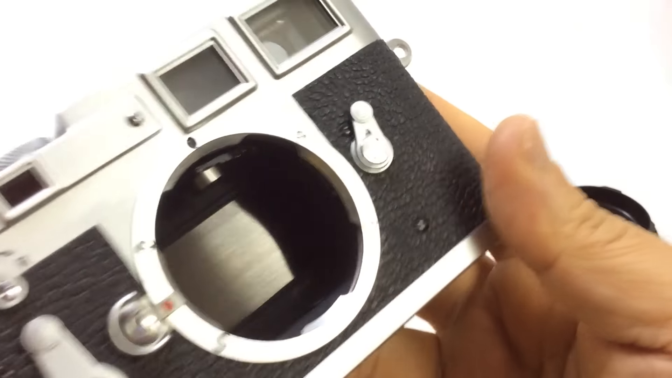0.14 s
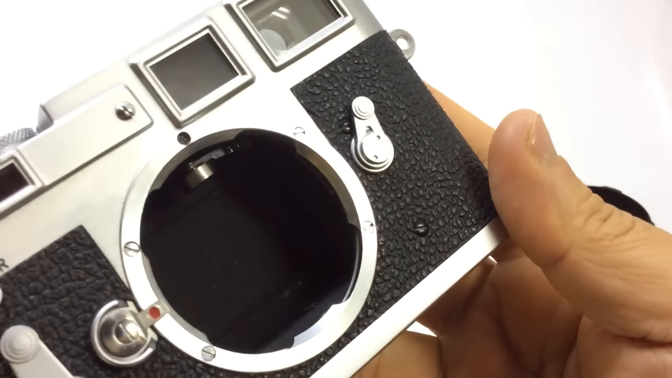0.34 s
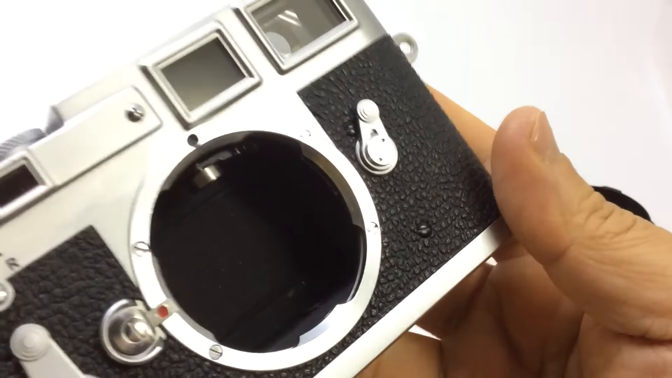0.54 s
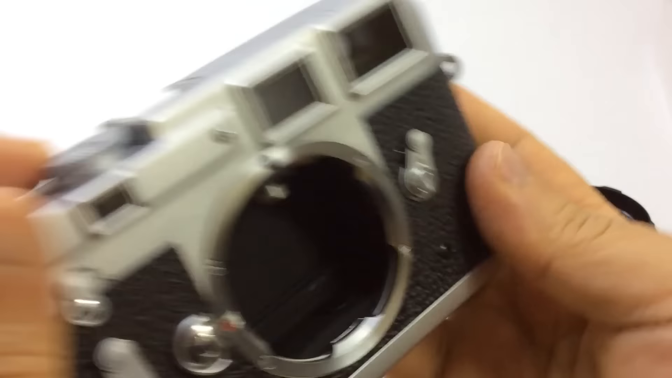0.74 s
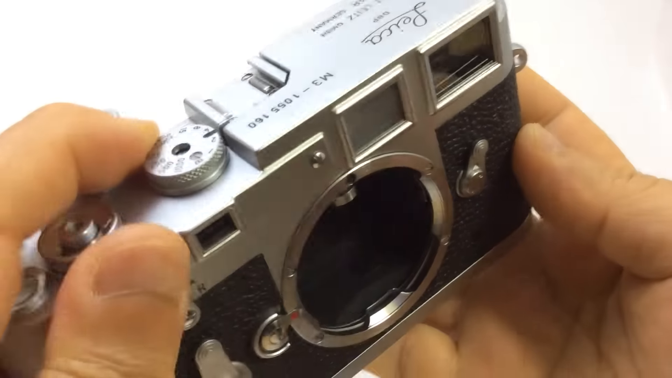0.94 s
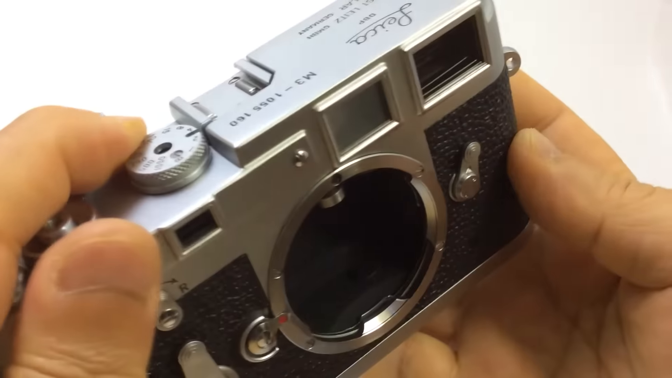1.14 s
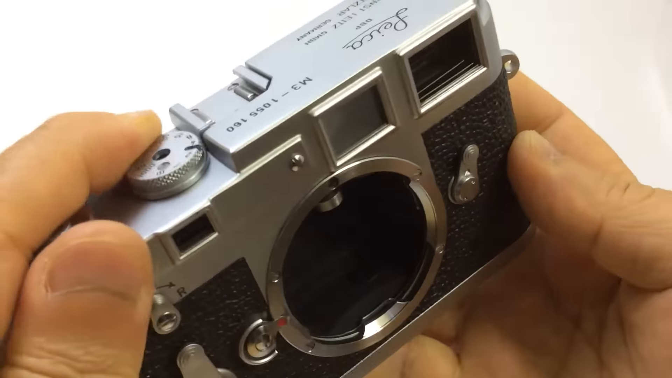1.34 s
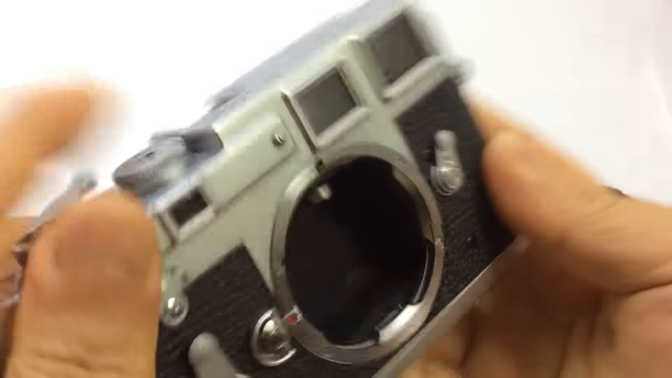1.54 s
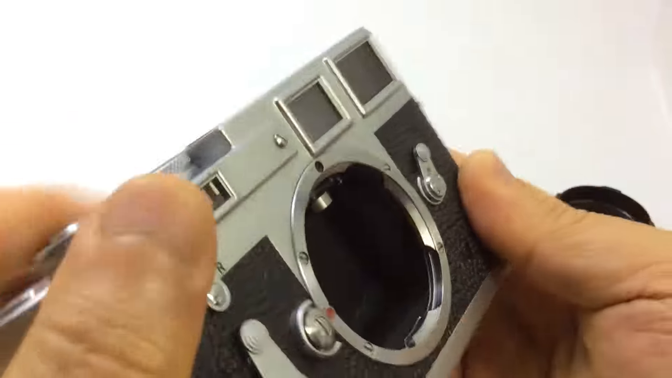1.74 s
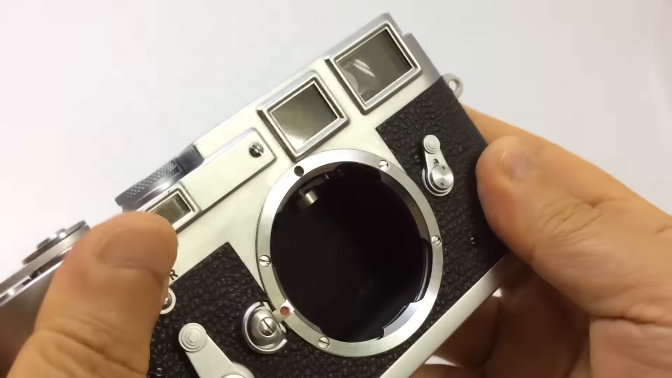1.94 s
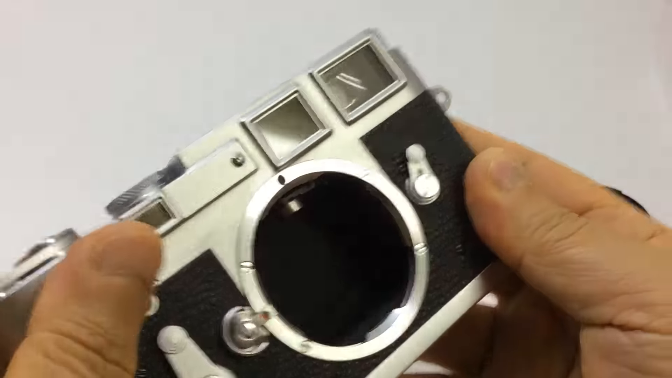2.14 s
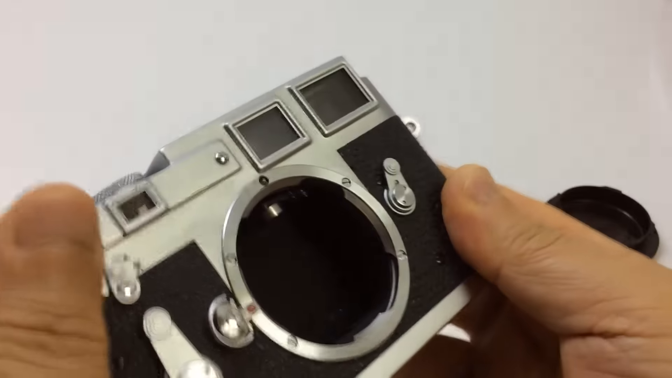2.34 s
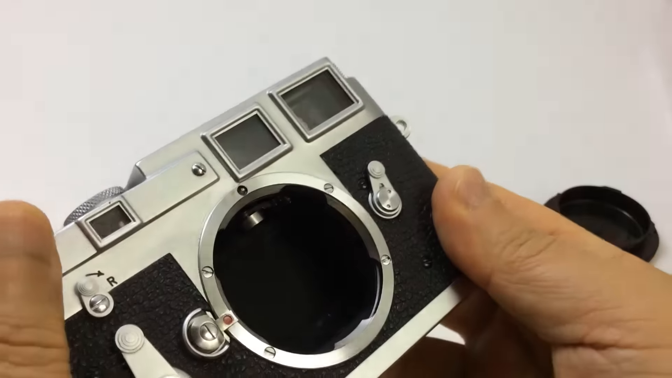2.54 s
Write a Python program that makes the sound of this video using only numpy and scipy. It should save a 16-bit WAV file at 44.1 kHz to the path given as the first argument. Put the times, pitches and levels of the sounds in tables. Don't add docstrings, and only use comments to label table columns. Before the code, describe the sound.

Mechanical camera shutter fires sharply, whirrs down, then dial clicks and a crunchy film lever wind follow

```python
import sys
import numpy as np
from scipy import signal
from scipy.fft import rfft, irfft
from scipy.io import wavfile

SR = 44100
rng = np.random.default_rng(int(sys.argv[2]) if len(sys.argv) > 2 else 0)


def put_to_file(sound):
    columns = np.atleast_2d(sound).T
    safe = np.clip(columns, -1, 1)
    whole_steps = np.round(safe * 32767)
    wavfile.write(sys.argv[1], SR, whole_steps.astype(np.int16))


def convert_level_to_amplitude(level_db):
    exponent = np.asarray(level_db, float) / 20
    return 10 ** exponent


N = 116865

# (frequency [Hz], density [dB per Hz])
WIND_COLOUR = [(180, -45), (300, -27.5), (900, -8.5), (1930, 0.5), (3600, -1), (5800, -4), (9550, 2.5),
               (14200, -13.5), (16000, -21.5)]
# (frequency [Hz], density [dB per Hz])
LEVER_COLOUR = [(180, -69), (300, -40.5), (1750, -15), (2570, 1), (3240, -10.5), (3700, 1.5), (5250, -15.5),
                (9240, -17.5), (16000, -31.5)]
# (frequency [Hz], level [dB], t60 [s])
LEVER_MODES = [(1461, -6, 0.028), (2146, -21, 0.076), (2890, -14, 0.035), (3660, -7, 0.026),
               (3670, 2.5, 0.023), (3830, -6, 0.017), (9060, -6, 0.011)]


def curve(rows, column=1):
    return np.interp(np.arange(N) / SR, np.array(rows)[:, 0], np.array(rows)[:, column])


def rms_one(x):
    return x / np.sqrt(np.mean(x ** 2) + 1e-20)


def cut(x, hz, kind, order=2):
    return signal.sosfilt(signal.butter(order, hz, kind, fs=SR, output="sos"), x)


def noise_band(low_hz, high_hz):
    return rms_one(cut(rng.standard_normal(N), [low_hz, high_hz], "band"))


def drift(rate_hz):
    r = np.exp(-2 * np.pi * rate_hz / SR)
    return rms_one(signal.lfilter([1], [1, -2 * r, r * r], rng.standard_normal(N + SR))[SR:])


def colour(x, points):
    hz = np.maximum(np.fft.rfftfreq(2048, 1 / SR), 20)
    p = np.array(points)
    db = np.maximum(np.interp(np.log(hz), np.log(p[:, 0]), p[:, 1]), -70)
    cepstrum = irfft(np.log(10) / 20 * db)
    cepstrum[1:1024] *= 2
    cepstrum[1025:] = 0
    taps = irfft(np.exp(rfft(cepstrum)))
    return signal.fftconvolve(x, taps / np.linalg.norm(taps))[:len(x)]


def rings(x, modes):
    out = 0
    for hz, db, t60_s in modes:
        r = convert_level_to_amplitude(-60 / (np.clip(t60_s, .005, 150 / hz) * SR))
        w = 2 * np.pi * hz / SR
        out = out + convert_level_to_amplitude(db) * signal.lfilter([0, np.sin(w)], [1, -2 * r * np.cos(w), r * r], x + 1e-18)
    return out


def grit(per_s):
    spread_db = 2.5
    size = convert_level_to_amplitude(spread_db * np.minimum(rng.exponential(1, N), 3)) * rng.choice([-1, 1], N)
    return rms_one(size * (rng.random(N) < per_s / SR))


def tilt(low, mid, high):
    low_hz, high_hz = 3100, 5960
    middle = cut(mid, [low_hz, high_hz], "band")
    return cut(low, low_hz, "low") - middle + cut(high, high_hz, "high")


def blows(rows, points, modes, ring_db):
    rise_s, crack_db, strike_db = .0005, -12.5, 7
    force, contacts = np.zeros((3, N)), grit(26000)
    for s, db, low_db, high_db, t60_s in rows:
        i = int(s * SR)
        t = np.arange(min(N - i, SR // 4)) / SR
        decay = convert_level_to_amplitude(-60 * t / max(t60_s, .003))
        burst = decay * (1 - np.exp(-t / rise_s)) * contacts[i:i + len(t)]
        burst[int(rise_s * SR)] = convert_level_to_amplitude(strike_db)
        band_gain = convert_level_to_amplitude(np.array([[low_db], [0], [high_db]]))
        force[:, i:i + len(t)] += convert_level_to_amplitude(db + crack_db) * burst * band_gain
    hit = tilt(*force)
    return colour(hit, points) + convert_level_to_amplitude(ring_db - 27.5) * rings(hit, modes)


def shutter():
    # (time [s], peak [dB], lows [dB], highs [dB], rattle t60 [s])
    slams = [
        (.0915, -35, 11, -2, 0.04),
        (.2154, -21.5, -14.5, 3.5, .018),
        (.2257, -31, -1.5, 5.5, 0.017),
        (.2377, -16.5, -2.5, 6, 0.012),
        (.2392, 0, -5.5, 0, 0.018),
        (.2413, -3, 6, -2, 0.018),
        (.2433, -12, 7, -3.5, 0.028),
        (.2461, -14, 1, 0.5, 0.01),
    ]
    # (frequency [Hz], density [dB per Hz])
    body = [(180, -52), (400, -20), (1150, -19), (1900, -7), (4200, -20.5), (6300, -12.5), (10900, -1),
            (14700, -31), (16000, -40.5)]
    # (frequency [Hz], level [dB], t60 [s])
    modes = [(1900, -13.5, .03), (3150, -10.5, 0.016), (5610, -8.5, 0.033), (6220, 1, .02),
             (7830, -2.5, .02), (9180, -8, .016), (11100, -3, .014), (14110, -5, 0.011)]
    return blows(slams, body, modes, ring_db=-1.0)


def escapement(times_s, db, t60_s, ring_db, body_db):
    # (frequency [Hz], density [dB per Hz])
    body = [(710, -41), (1200, -17), (2040, -7.5), (2590, -4), (3600, 0), (4600, -7), (10500, -4),
            (15200, -16), (16000, -44)]
    # (frequency [Hz], level [dB], t60 [s])
    modes = [(2637, -6, 0.036), (2540, -12, 0.017), (3287, -15.5, .035), (3600, -10.5, 0.028),
             (5010, -13.5, 0.022), (5750, -9, .015), (6637, -14.5, 0.026), (8270, -8, 0.015),
             (9216, -14, .016), (10550, -7, 0.0055)]
    clicks = np.zeros(N)
    clicks[(times_s * SR).astype(int)] = convert_level_to_amplitude(db + 1.1 * rng.standard_normal(len(times_s)))
    hit = signal.lfilter([1], [1, -convert_level_to_amplitude(-60 / (t60_s * SR))], clicks) * grit(14000)
    return convert_level_to_amplitude(body_db) * colour(hit, body) + convert_level_to_amplitude(ring_db) * rings(hit, modes)


def whirr():
    # (time [s], level [dB])
    load = [(0, -48.5), (.05, -52), (.2, -49.5), (.236, -47.5)]
    beats_per_s = 200
    times_s = np.arange(.002, load[-1][0], 1 / beats_per_s)
    db = np.interp(times_s, *np.transpose(load))
    return escapement(times_s, db, t60_s=0.025, ring_db=-17.5, body_db=-0.5)


def buzz():
    # (time [s], beats done)
    progress = [(.2513, 0), (.4793, 20), (.7073, 40), (.8001, 48), (.9214, 58)]
    # (time [s], level [dB])
    levels = [(.25, -58), (.45, -59.5), (.7, -60), (.92, -62.5)]
    weak_db, jitter_s = -2.2, 0.00068
    beat = np.arange(59)
    done_s, done = np.transpose(progress)
    times_s = np.interp(beat, done, done_s) + jitter_s * rng.standard_normal(len(beat))
    db = np.interp(times_s, *np.transpose(levels)) + weak_db * (beat % 2)
    return escapement(times_s, db, t60_s=.05, ring_db=-21, body_db=-1)


def dial():
    # (time [s], peak [dB], lows [dB], highs [dB], rattle t60 [s])
    detents = [
        (.957, -62, 18, -4, 0.044),
        (1.314, -55, 8, 8, 0.027),
        (1.3875, -41.5, 4.5, 9, 0.033),
        (1.598, -53, 6, 3, 0.022),
        (1.630, -68.5, 11.5, 3.5, 0.045),
        (1.7455, -49.5, 11, 14.5, 0.027),
    ]
    return blows(detents, LEVER_COLOUR, LEVER_MODES, ring_db=-23)


def winding():
    # (time [s], peak [dB], lows [dB], highs [dB], rattle t60 [s])
    catches = [(1.7985, -39, 6.5, -2, 0.03), (1.8195, -45, -2, -3, .02), (1.8238, -27, -4.5, -19, .02),
               (1.8322, -23.5, -22, -11.5, 0.044), (1.848, -17, -6, -5, 0.039),
               (1.8684, -34, -10, -2, 0.015), (1.8725, -31, 7, -1.5, 0.056), (1.8938, -35, 9, -4, 0.029),
               (1.906, -39, 4, -2, 0.022), (1.917, -36, 8, -6, 0.027), (1.928, -36, -7, -6, 0.026),
               (1.9395, -58, 28, 32, 0.021), (1.944, -21.5, -1, 10, 0.029), (1.962, -32, 2, -2, 0.024),
               (1.974, -36, -8, 5, 0.017), (2.001, -42, -3, -5, .025), (2.017, -37, 6, -5, 0.023),
               (2.043, -43, 1, -7, 0.036), (2.0613, -38, 9, -3, 0.04), (2.0779, -43, 10, 15, 0.02),
               (2.0845, -20, -4, -1, 0.021), (2.0898, -10.5, -5, -1, 0.03), (2.1066, -10, 2.5, 5.5, 0.03),
               (2.1103, -11, -1, -3.5, 0.019), (2.1295, -28.5, -4, 15, 0.0067), (2.144, -34, -6, 6, 0.025)]
    # (frequency [Hz], level [dB], t60 [s])
    modes = [(1043, 1.5, 0.026), (2180, -35, 0.016), (3110, -14, .03), (3486, -4.5, 0.016), (3810, 3, .014),
             (8050, 3, .02), (9650, 0.5, .02)]
    return blows(catches, WIND_COLOUR, modes, ring_db=-7)


def lever_return():
    # (time [s], peak [dB], lows [dB], highs [dB])
    ratchet = [(2.2555, -44, 4, 11), (2.265, -47, 2.5, 21), (2.2761, -46, -1, 12), (2.2897, -44, 2, 20),
               (2.298, -39.5, 5, 11), (2.3106, -60, 5, 13), (2.323, -47.5, 7, 20.5), (2.3344, -53, 15, 22),
               (2.3471, -54, 13, 21)]
    # (time [s], peak [dB], lows [dB], highs [dB], rattle t60 [s])
    stop = [
        (2.3576, -44, 14, -2, 0.019),
        (2.3595, -44, 3, 21, 0.076),
        (2.366, -13, 2.5, 7, 0.014),
        (2.3707, -28.5, 0, 17, 0.019),
        (2.3855, -46, -10, 11, 0.019),
    ]
    tick_t60_s = 0.022
    ticks = [tick + (tick_t60_s,) for tick in ratchet]
    return blows(ticks + stop, LEVER_COLOUR, LEVER_MODES, ring_db=1.5)


def rubs():
    # (start [s], length [s], level [dB], highs [dB])
    slides = [
        (0, 0.078, -52, 3),
        (0.21, 0.054, -47, -1),
        (0.943, 0.14, -71.5, -22.5),
        (1.312, 0.065, -67, -6.5),
        (1.603, 0.15, -72.5, -4.5),
        (1.73, 0.02, -69.5, -9),
        (1.802, 0.043, -73, 3),
        (1.814, 0.24, -61, -7.5),
        (1.93, 0.29, -60.5, -7),
        (2.246, 0.31, -62.5, 0),
    ]
    edge_s = .006
    t, low, high = np.arange(N) / SR, 0, 0
    for s, length_s, db, high_db in slides:
        rise = np.clip((t - s) / edge_s + (s < .001), 0, 1)
        fall = np.clip((s + length_s - t) / (0.76 * length_s), 0, 1) ** 2
        shape = convert_level_to_amplitude(db) * rise * fall
        low = low + shape
        high = high + shape * convert_level_to_amplitude(high_db)
    grains = (grit(4200) + rng.standard_normal(N)) * convert_level_to_amplitude(1.17 * drift(70))
    grains = grains + convert_level_to_amplitude(-3.5) * grit(90)
    return colour(tilt(low * grains, low * grains, high * grains), WIND_COLOUR)


def struck_parts():
    # (time [s], frequency [Hz], peak [dB], t60 [s])
    parts = [(.0915, 1100, -46, 0.027), (.2385, 1644, -22.5, 0.041), (.2388, 426, -33, 0.03),
             (.2391, 248, -55, 0.06), (.2395, 3600, -16.5, 0.022), (.2398, 2690, -26, 0.023),
             (.243, 567, -35.5, 0.062), (.248, 1658, -50, 0.25), (.274, 3675, -38.5, .06),
             (1.8205, 690, -49.5, 0.084), (1.851, 705, -39, 0.046), (1.8672, 3600, -42, 0.044),
             (1.8722, 710, -48, .035), (1.8735, 1720, -52, 0.016), (1.8745, 3680, -44.5, .06),
             (1.9445, 8130, -37, 0.091), (2.0607, 1840, -39, 0.012), (2.085, 1700, -32.5, 0.033),
             (1.9, 1410, -50, 0.018), (2.1068, 1924, -29.5, 0.03), (2.1072, 704, -28.5, 0.053),
             (2.1076, 408, -39.5, 0.044), (2.112, 3930, -46, 0.23), (2.126, 680, -38, 0.064),
             (2.161, 696, -45, .04), (2.3662, 3800, -16, 0.01), (2.368, 1260, -35.5, 0.019),
             (2.369, 2120, -39.5, 0.049), (2.371, 3730, -40.5, 0.14), (2.372, 2620, -47, 0.073),
             (2.374, 4000, -48, 0.19)]
    rise_cycles, waver_db, blur, blur_from_hz = 0.96, 5.5, .055, 1500
    out, wander = np.zeros(N), drift(126)
    for k, (s, hz, db, t60_s) in enumerate(parts):
        i = int(s * SR)
        t = np.arange(min(N - i, SR // 3)) / SR
        onset = np.minimum(t / .01, 1)
        pitch_wander = wander[k * 3000:][:len(t)] * onset
        level_wander = wander[::-1][k * 3000:][:len(t)] * onset
        pitch_hz = hz + blur * max(hz - blur_from_hz, 0) * pitch_wander
        phase = 2 * np.pi * np.cumsum(pitch_hz) / SR
        level_db = db - 60 * t / max(t60_s, .005) + waver_db * level_wander * min(hz / 2000, 1)
        out[i:i + len(t)] += convert_level_to_amplitude(level_db) * (1 - np.exp(-t * hz / rise_cycles)) * np.sin(phase)
    return out


def room(x):
    start_s, t60_low_s, t60_high_s = .002, 0.29, 0.27
    t = np.arange(SR // 2) / SR
    low, high = rng.standard_normal((2, len(t)))
    tail = cut(low, 4500, "low") * convert_level_to_amplitude(-60 * t / t60_low_s)
    tail = tail + cut(high, 6700, "high") * convert_level_to_amplitude(-60 * t / t60_high_s)
    tail = tail * np.clip(t / start_s, 0, 1)
    return signal.fftconvolve(x, tail / np.linalg.norm(tail))[:N]


def grip():
    # (centre [s], width [s], level [dB])
    shifts = [
        (.42, 0.014, -66.5),
        (.72, 0.26, -71),
        (2.501, 0.095, -70.5),
    ]
    t = np.arange(N) / SR
    swell = sum(convert_level_to_amplitude(db) * np.exp(-((t - s) / width_s) ** 2) for s, width_s, db in shifts)
    return swell * convert_level_to_amplitude(2.0 * drift(45)) * noise_band(171.9, 341.4)


def mains_hum():
    # (frequency [Hz], rms [dB])
    harmonics = [(120, -60), (240, -75), (360, -79.5)]
    t, out = np.arange(N) / SR, 0
    for hz, db in harmonics:
        out = out + np.sqrt(2) * convert_level_to_amplitude(db + 1.6 * drift(9.2)) * np.sin(2 * np.pi * hz * t)
    return out


def fan():
    # (time [s], frequency [Hz], rms [dB])
    speed = [(0, 52.6, -65), (.7, 54.07, -59), (1.1, 52.93, -60), (1.45, 53.25, -70.5), (1.8, 52.12, -61.5),
             (2.1, 51.25, -71), (2.4, 50.1, -65), (2.65, 50.56, -66)]
    level = np.sqrt(2) * convert_level_to_amplitude(curve(speed, column=2) + 0.77 * drift(8.7))
    return level * np.sin(2 * np.pi * np.cumsum(curve(speed)) / SR)


def rumble():
    return convert_level_to_amplitude(-73) * noise_band(65, 105) + convert_level_to_amplitude(-81) * noise_band(22, 50)


def air():
    # (frequency [Hz], density [dB per Hz])
    spectrum = [(170, -14.5), (380, -23.5), (520, -26.5), (900, -23), (1450, -24), (2270, -39), (6000, -43),
                (9000, -39), (15000, -51.5)]
    # (frequency [Hz], rms [dB], t60 [s])
    duct = [(803, -80, 0.036), (988, -81, 0.28), (1670, -85, .05)]
    hiss = cut(colour(rng.standard_normal(N), spectrum), 93, "high", order=4)
    out = convert_level_to_amplitude(-66 + .7 * drift(1.7)) * hiss
    for hz, db, t60_s in duct:
        out = out + convert_level_to_amplitude(db) * rms_one(rings(rng.standard_normal(N), [(hz, 0, t60_s)]))
    return out


def scene():
    camera = shutter() + whirr() + buzz() + dial() + winding() + lever_return() + rubs()
    camera = cut(camera, 218, "high")
    rung = struck_parts()
    tail = convert_level_to_amplitude(-10) * room(camera + convert_level_to_amplitude(-7) * rung)
    background = grip() + mains_hum() + fan() + rumble() + air()
    return (camera + rung + tail + background)[None]


def low_pass(x):
    return signal.sosfilt(signal.butter(12, 16330, fs=SR, output="sos"), x)


def record(dry):
    top = signal.cheby2(8, 34, 16150, fs=SR, output="sos")
    return low_pass(signal.sosfilt(top, dry))


dry = scene()
out = record(dry)
put_to_file(out)
```